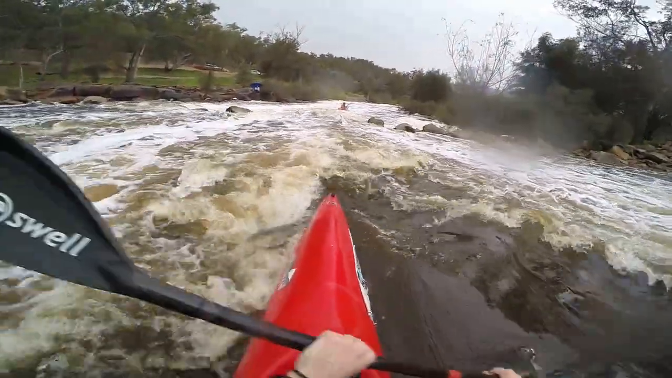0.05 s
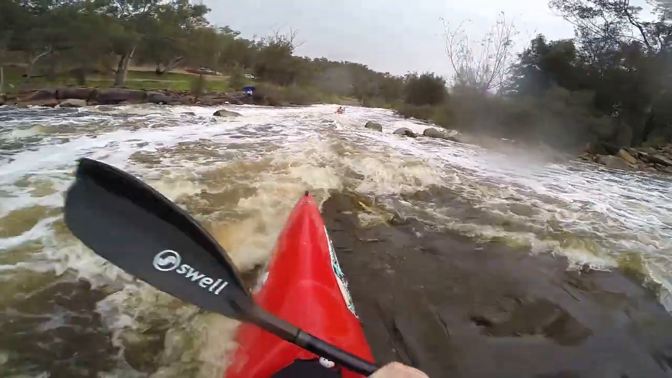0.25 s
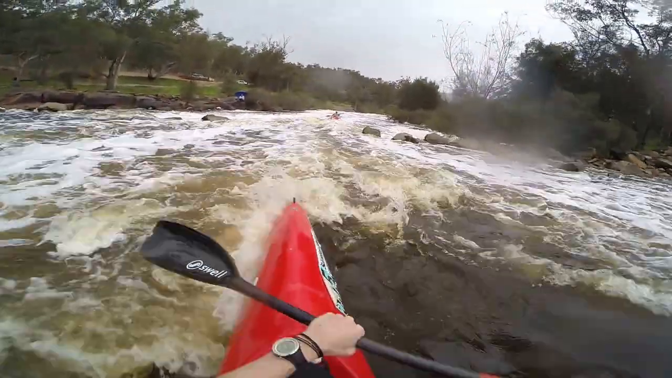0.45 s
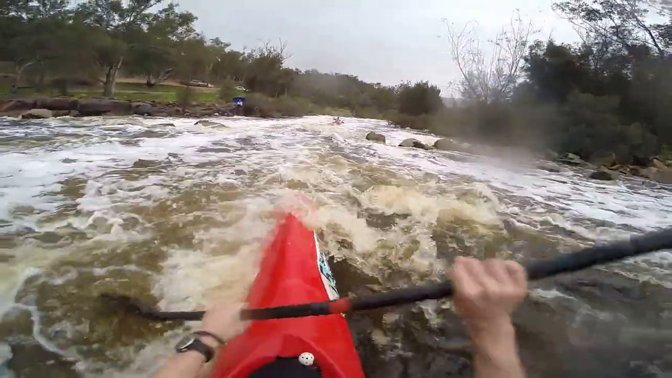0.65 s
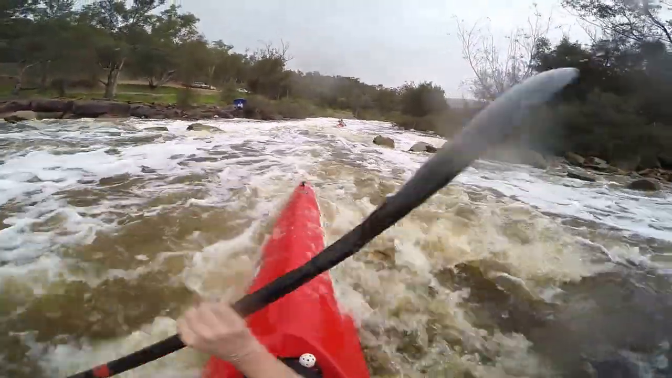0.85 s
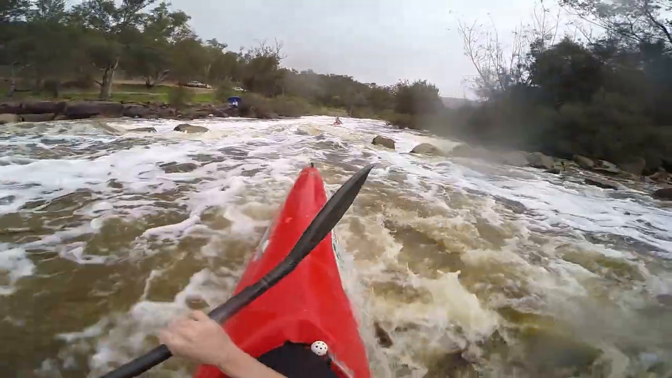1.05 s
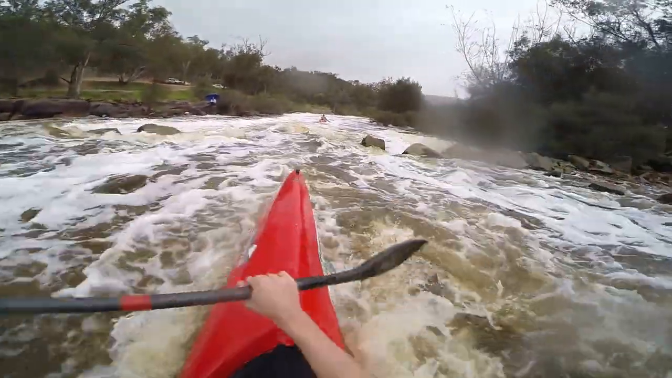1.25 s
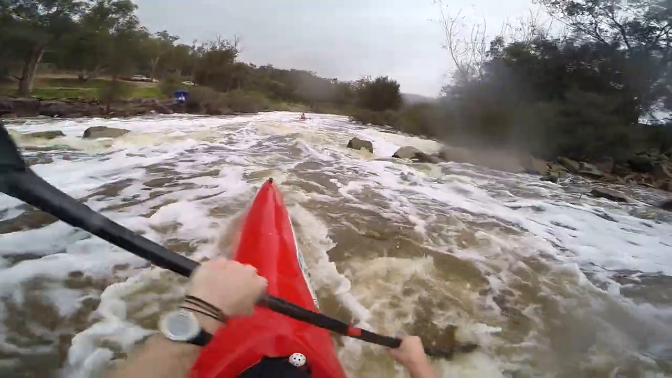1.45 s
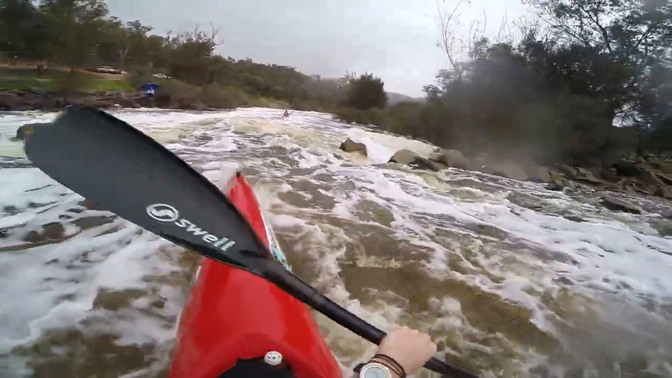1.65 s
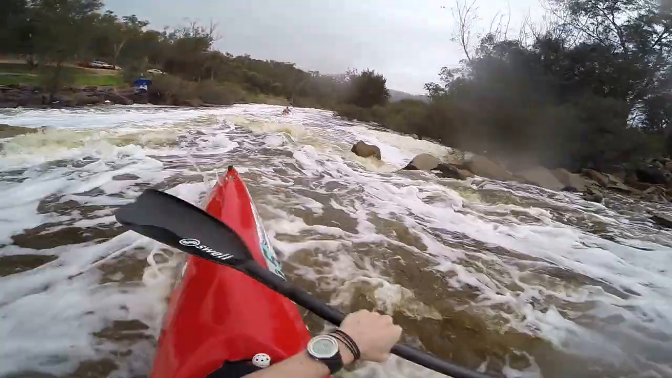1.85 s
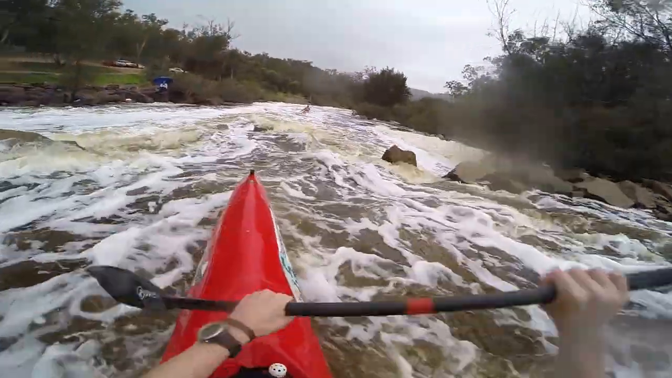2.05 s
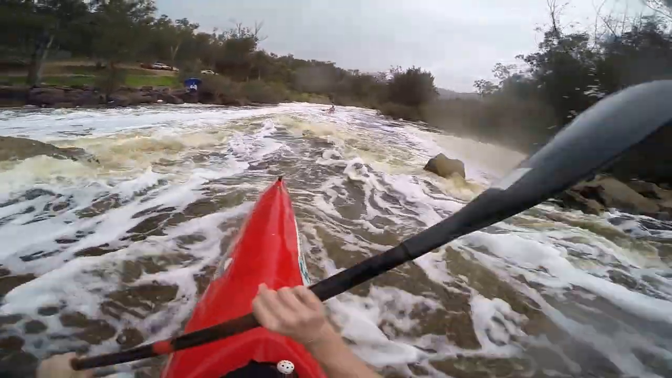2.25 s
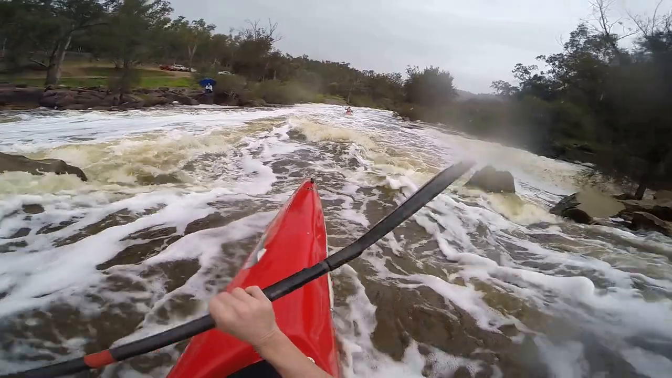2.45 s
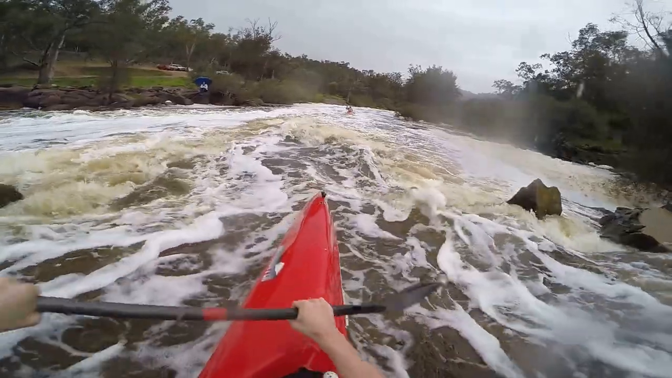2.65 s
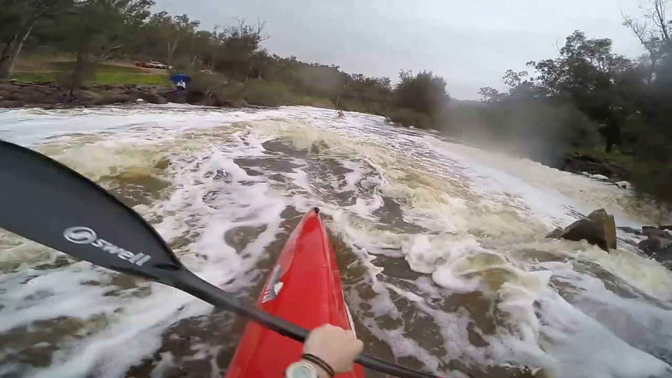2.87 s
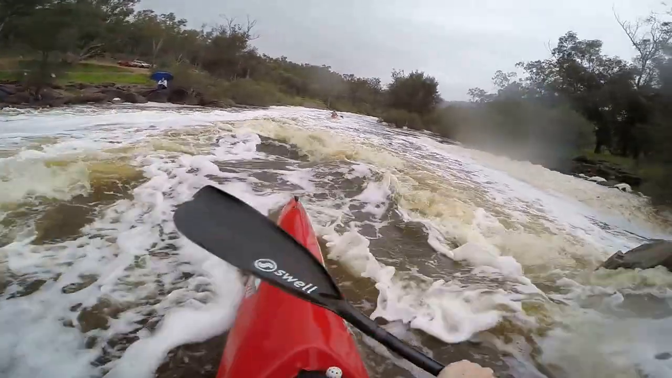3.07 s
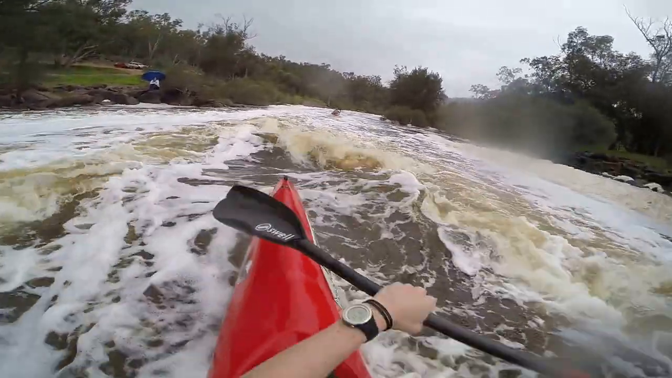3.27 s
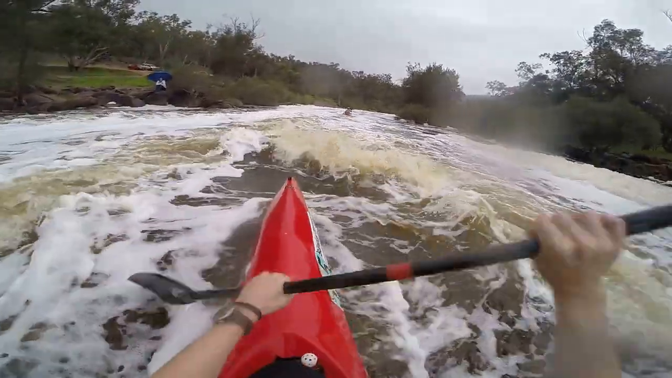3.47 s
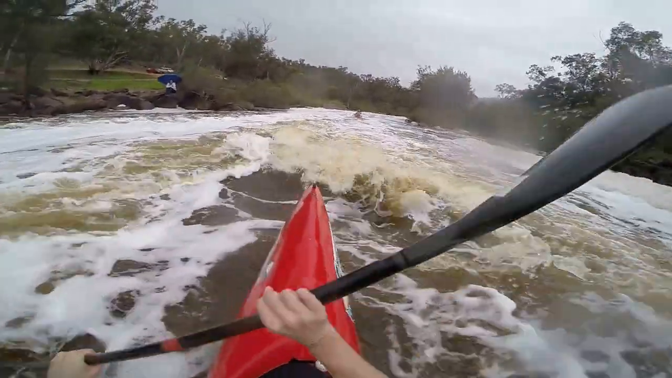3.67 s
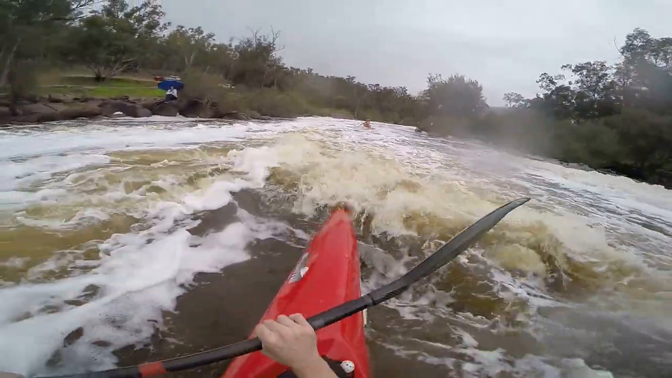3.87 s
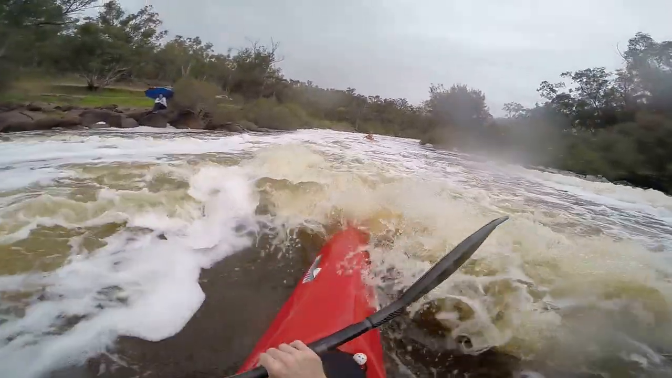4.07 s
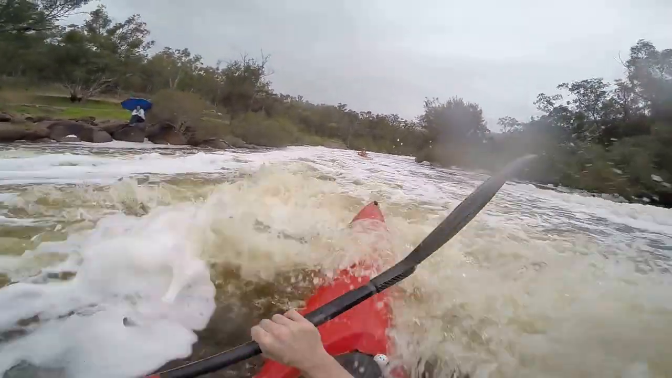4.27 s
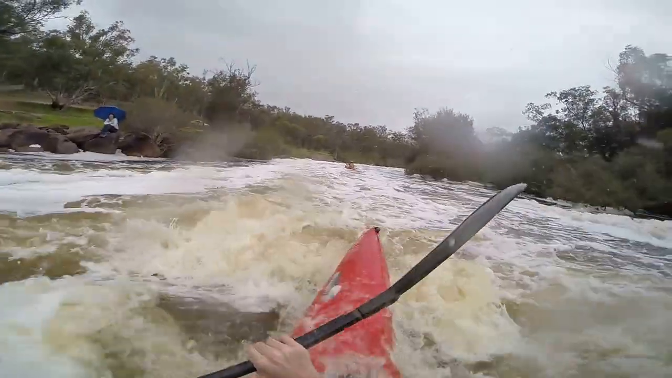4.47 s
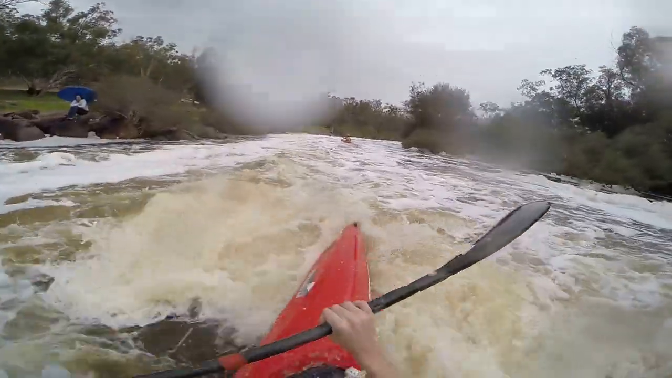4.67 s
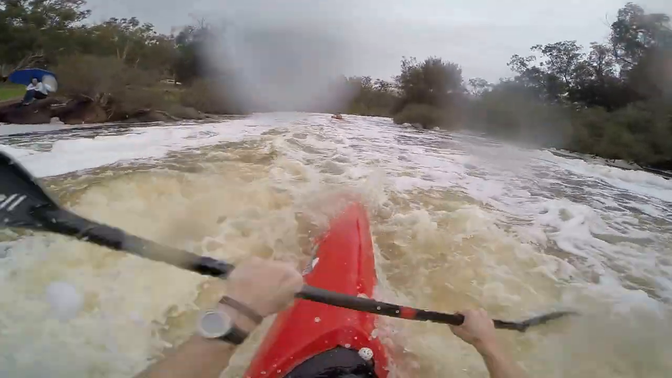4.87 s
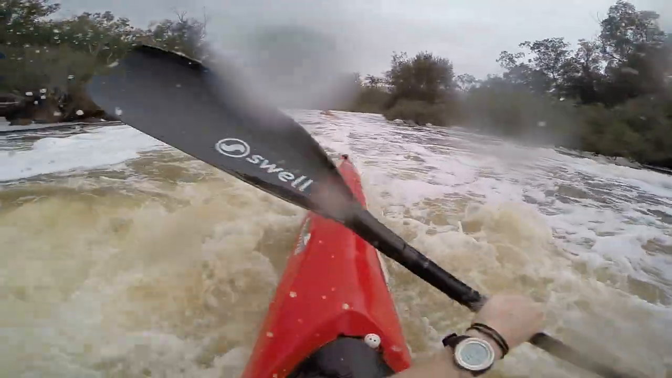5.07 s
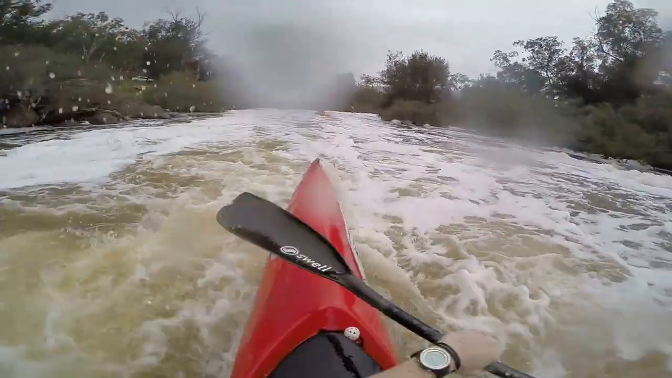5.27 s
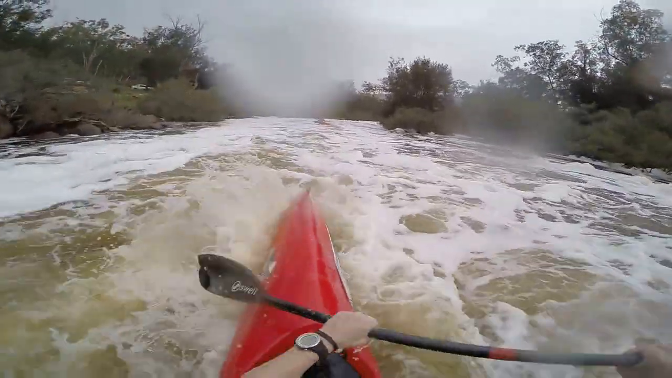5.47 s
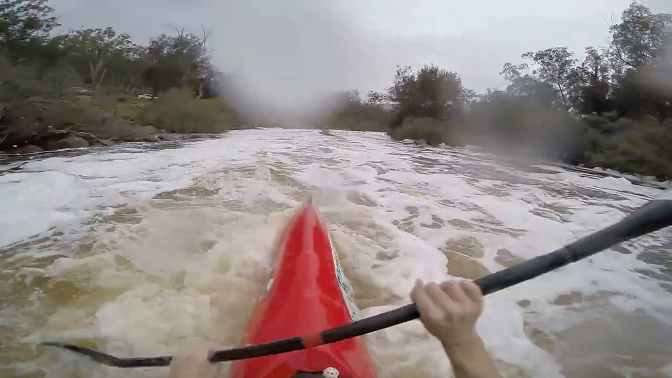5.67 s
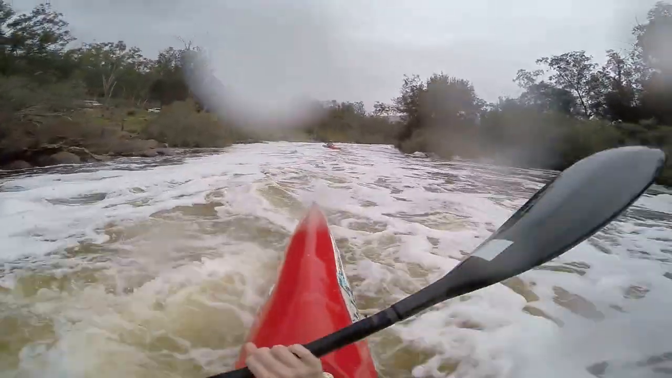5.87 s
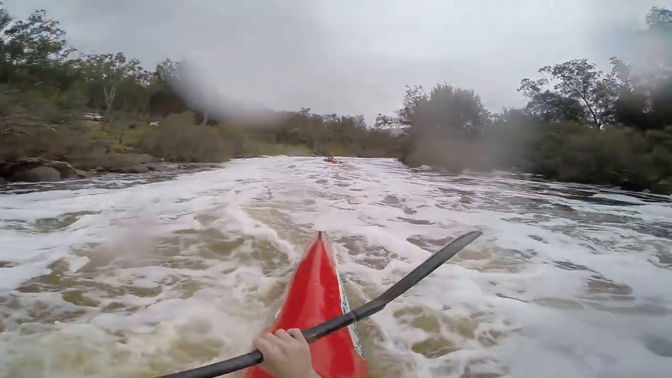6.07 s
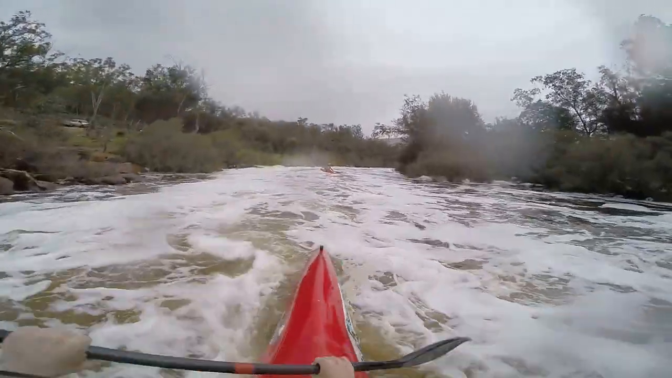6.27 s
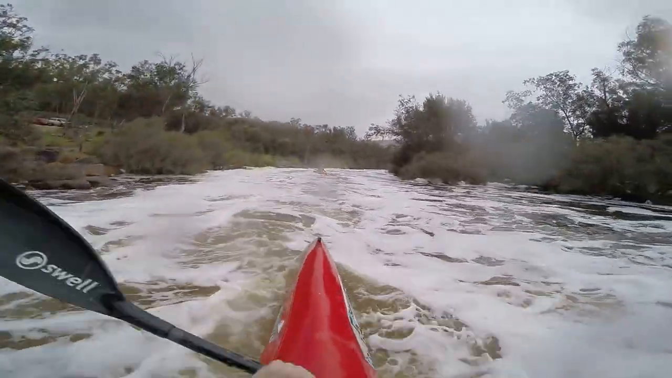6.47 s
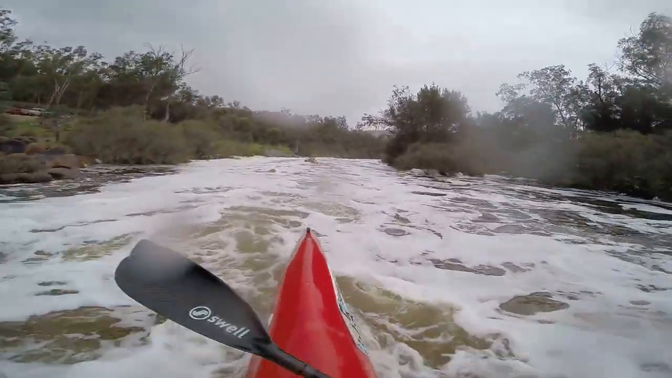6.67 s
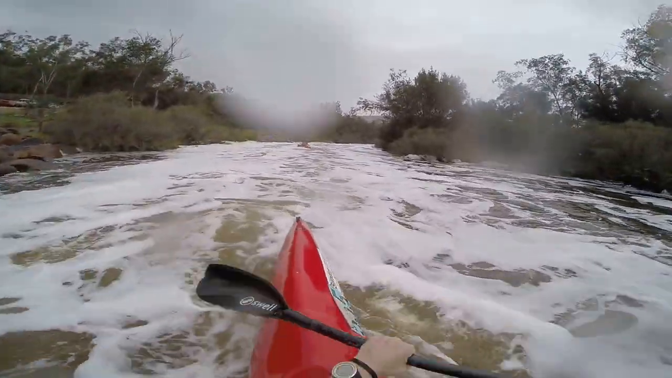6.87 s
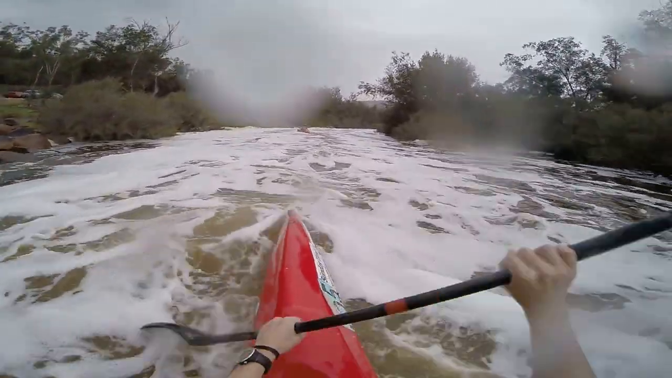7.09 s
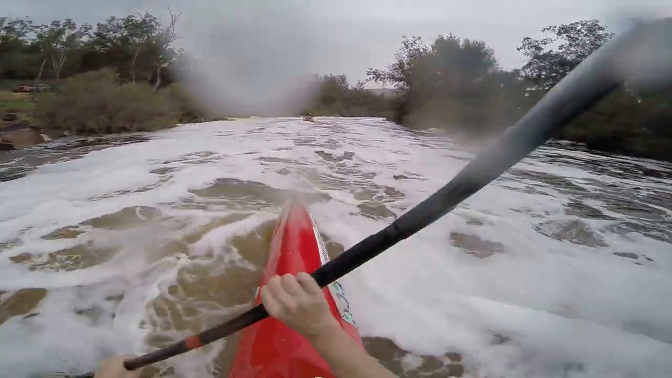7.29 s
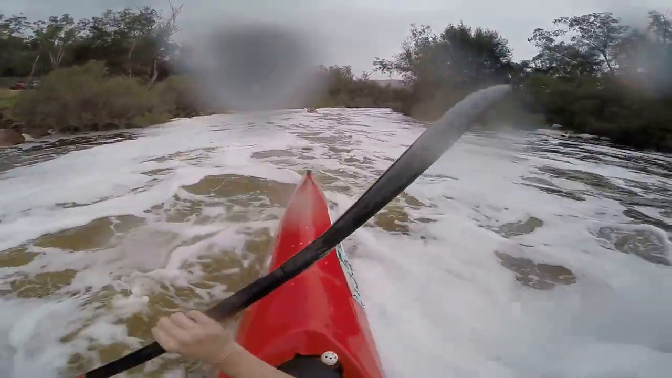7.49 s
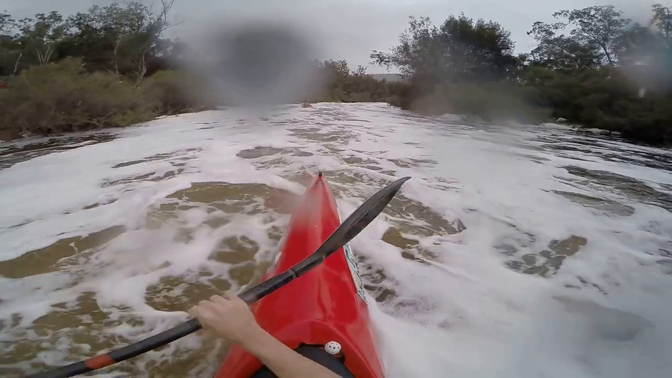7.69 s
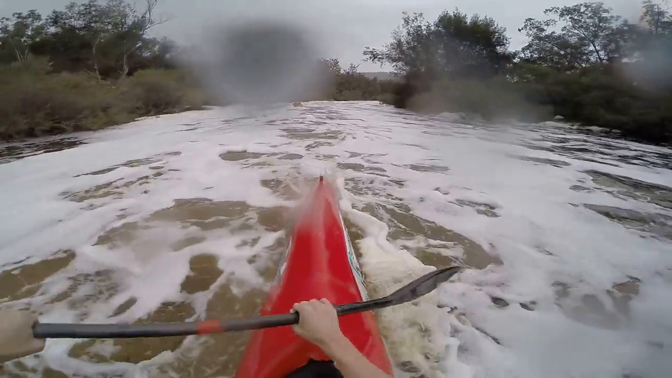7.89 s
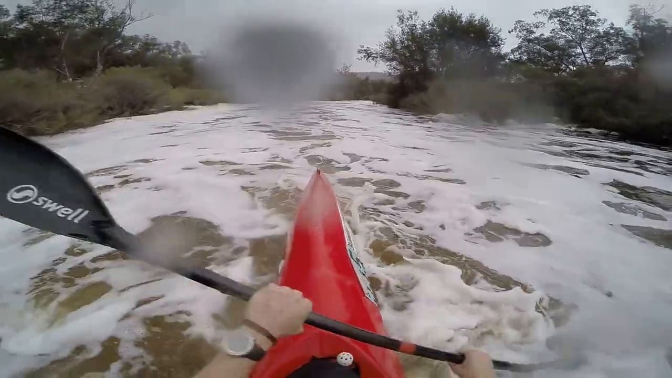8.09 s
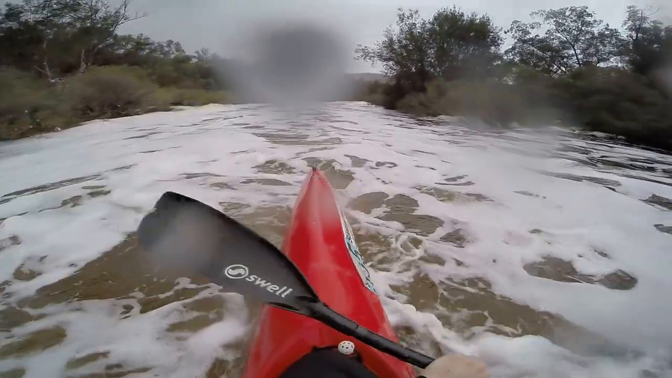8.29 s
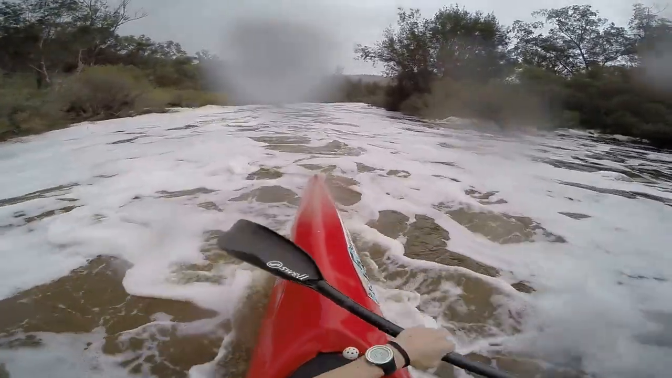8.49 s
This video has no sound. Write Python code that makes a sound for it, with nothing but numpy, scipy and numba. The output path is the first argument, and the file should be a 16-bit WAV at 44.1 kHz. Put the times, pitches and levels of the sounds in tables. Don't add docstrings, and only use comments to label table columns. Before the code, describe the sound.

A rushing, boxy river roar starts strong, eases, then swells as the boat hits a breaking wave. Hollow hull booms, dull slaps and a brief wavering low hum accompany crackling drops on the microphone's plastic shell. Afterward the water quickly thins, leaving faint foam, a small hiss and short airy whistle of water shedding from the paddle, and light ticks outdoors.

```python
import sys
import numpy as np
from scipy import signal
from scipy.fft import rfft, irfft, next_fast_len
from scipy.io import wavfile
from scipy.ndimage import uniform_filter1d
from numba import njit

SR = 44100
rng = np.random.default_rng(int(sys.argv[2]) if len(sys.argv) > 2 else 0)


def decibels_to_gain(level_db):
    exponent = np.asarray(level_db, float) / 20
    return 10 ** exponent


def pcm_store(signal):
    levels = np.round(np.clip(np.atleast_2d(signal), -1, 1) * 32767)
    wavfile.write(sys.argv[1], SR, levels.astype(np.int16).T)


N = 376613

# [t/s, level/dB]
FLOW = [(0, -41), (.26, -39), (.9, -37.5), (1.4, -40.5), (1.7, -42.5), (2.2, -46.5), (2.9, -45.5),
        (3.2, -41.5), (4.0, -39), (4.45, -38.5), (4.62, -34.5), (4.86, -40.5), (5.4, -40.5), (5.7, -47),
        (6.1, -48.5), (6.5, -54), (7.1, -54.5), (8.3, -59)]


def curve(table, column):
    table = np.array(table)
    return np.interp(np.arange(N) / SR, table[:, 0], table[:, column])


def walk(rate):
    hold = int(SR / rate)
    steps = np.repeat(rng.standard_normal(N // hold + 1), hold)
    return 1.2 * uniform_filter1d(uniform_filter1d(steps, hold), hold)[:N]


def swell(rows):
    t = np.arange(N) / SR
    power = 0
    for peak_s, db, rise_s, fall_s in rows:
        side_s = np.where(t < peak_s, rise_s, fall_s)
        power = power + decibels_to_gain(2 * db) * np.exp(-((t - peak_s) / side_s) ** 2)
    return np.sqrt(power)


def follow(db, slope):
    loud_db = -40
    return decibels_to_gain(db + slope * (curve(FLOW, 1) - loud_db))


def shade(points, hz):
    points = np.array(points)
    return np.interp(np.log(hz + 1e-9), np.log(points[:, 0]), points[:, 1])


def colour(x, points, lo_hz, hi_hz):
    hz = np.fft.rfftfreq(N, 1 / SR)
    spectrum = rfft(x) * decibels_to_gain(shade(points, hz))
    inside = (hz > lo_hz) & (hz < hi_hz)
    power = 2 * np.sum(np.abs(spectrum[inside]) ** 2) / N ** 2
    return irfft(spectrum, N) / np.sqrt(power)


def housing(x):
    # [f/Hz, width/Hz, level/dB]
    resonances = [(975, 290, -1), (1264, 67, 3), (1730, 660, 4.5), (2103, 230, -1.5), (2483, 540, 6.5),
                  (3036, 91, -5), (3356, 200, 3), (4744, 340, 4), (5300, 840, -4.5), (5700, 360, 5),
                  (8470, 1140, 4.5), (10230, 840, -2), (11000, 700, -5.5), (12250, 1850, -6)]
    hz = np.fft.rfftfreq(4096, 1 / SR)
    db = sum(gain * np.exp(-(2 * (hz - f) / width) ** 2 / 2) for f, width, gain in resonances)
    cepstrum = irfft(np.log(decibels_to_gain(db)))
    cepstrum[1:2048] *= 2
    cepstrum[2049:] = 0
    response = irfft(np.exp(rfft(cepstrum)))[:1024]
    return signal.fftconvolve(x, response)[:N]


def far():
    # [f/Hz, level/dB per Hz]
    wash_colour = [(150, -13), (350, 1.5), (800, -3.5), (1500, -7.5), (3000, -8), (5000, -7), (8000, -22.5)]
    wash = colour(housing(rng.standard_normal(N)), wash_colour, 240, 1150)
    return wash * decibels_to_gain(-63 + 1.8 * walk(5))


def blade():
    # [f/Hz, level/dB per Hz]
    sheet_colour = [(1500, -11), (2600, -5.5), (3300, -0.5), (4800, -3), (6000, -11), (9000, -28),
                    (15000, -50)]
    seam_colour = [(2900, -38), (3280, -3), (3400, 0), (3550, -2), (4000, -37)]
    # [peak t/s, level/dB, rise/s, fall/s]
    sheets = [
        (6.63, -52, 0.079, 0.12),
        (7.38, -49, 0.1, 0.13),
    ]
    # [peak t/s, level/dB, rise/s, fall/s]
    whistles = [
        (7.46, -59, .06, .05),
        (7.55, -48.5, .04, 0.0099),
    ]
    sheet_gain = swell(sheets)
    seam_gain = np.hypot(sheet_gain * decibels_to_gain(-17), swell(whistles))
    sheet = colour(housing(rng.standard_normal(N)), sheet_colour, 2970, 5000) * decibels_to_gain(1.2 * walk(25))
    seam = colour(rng.standard_normal(N), seam_colour, 3100, 5000)
    return sheet * sheet_gain + seam * seam_gain


def mount():
    # [f/Hz, level/dB per Hz]
    shake_colour = [(8, 8.5), (20, 6.5), (45, -3.5), (70, -4.5), (120, -59.5)]
    # [peak t/s, level/dB, rise/s, fall/s]
    waves = [(.02, -44.5, .03, 0.12), (.31, -50, 0.022, 0.031), (1.04, -41, 0.21, 0.13),
             (1.64, -47, 0.081, 0.2), (2.45, -48, 0.067, 0.14), (2.9, -38, 0.045, 0.49),
             (3.73, -35.5, 0.05, 0.054), (4.45, -32, 0.17, .3), (5.26, -37, 0.16, 0.13),
             (5.85, -49.5, .06, 0.24), (6.56, -49.5, 0.048, 0.07), (6.92, -48.5, 0.048, 0.078),
             (7.32, -43, 0.051, .06), (7.6, -47.5, 0.069, 0.13), (8.13, -47.5, 0.06, 0.064),
             (8.29, -50, 0.032, 0.067), (8.54, -47, 0.053, .04)]
    shake = colour(rng.standard_normal(N), shake_colour, 17.4, 58)
    return shake * np.hypot(swell(waves), follow(-54, slope=0.26)) * decibels_to_gain(1.5 * walk(8.3))


def boom():
    # [f/Hz, level/dB per Hz]
    boom_colour = [(30, -31), (55, 1), (95, -2.5), (130, -4.5), (200, -10.5), (400, -19.5), (900, -49)]
    # [peak t/s, level/dB, rise/s, fall/s]
    surges = [(.45, -49.5, 0.038, .05), (.9, -49, 0.3, 0.12), (1.35, -52, .05, 0.047),
              (1.95, -53, 0.13, .05), (2.3, -50, 0.12, 0.35), (3.14, -45, 0.094, 0.067),
              (3.5, -45, 0.23, 0.12), (4.15, -43.5, 0.18, 0.18), (4.55, -41, 0.089, 0.19),
              (5.09, -47, .06, .06), (5.35, -44.5, .1, 0.091), (6.35, -54, .1, 0.11),
              (6.65, -53, .1, 0.079), (7.25, -57, 0.074, .06), (7.47, -55, 0.044, .05)]
    gain = np.hypot(swell(surges), follow(-50.5, slope=0.097))
    return colour(rng.standard_normal(N), boom_colour, 64.0, 200) * gain * decibels_to_gain(1.3 * walk(14))


def hum():
    # [start t/s, length/s, level/dB, first f/Hz, last f/Hz]
    flexes = [
        (5.094, 0.074, -30.5, 98.5, 100.4),
        (5.15, 0.092, -30.5, 98, 115),
        (5.221, 0.081, -28, 116.6, 104.3),
        (7.369, 0.27, -44.5, 182.3, 73.5),
    ]
    edge_s, settle_s = 0.036, 0.072
    hz, gain, t = np.full(N, 100.), np.zeros(N), np.arange(N) / SR
    for s, length, db, first_hz, last_hz in flexes:
        settling = last_hz + (first_hz - last_hz) * np.exp(-np.maximum(t - s, 0) / settle_s)
        hz = np.where(t > s, settling, hz)
        fade = np.clip(np.minimum(t - s, s + length - t) / edge_s, 0, 1)
        gain = np.maximum(gain, decibels_to_gain(db) * fade)
    phase = 2 * np.pi * np.cumsum(hz * (1 + 0.0741 * walk(45))) / SR
    tone = np.sin(phase) + 0.34 * np.sin(1.4 * phase)
    return np.sqrt(2) * tone * gain * decibels_to_gain(1.1 * walk(35))


def slaps():
    # [t/s, peak level/dB, f/Hz, t60/s]
    slap_table = [
        (2.776, -35.5, 77.6, 0.11),
        (2.902, -27, 75.4, 0.057),
        (4.126, -29, 80.7, 0.034),
        (4.865, -31, 72.7, 0.05),
        (4.993, -30, 83.4, 0.06),
        (5.345, -20, 96, 0.046),
        (5.9, -30, 76, 0.056),
        (6.772, -42, 71, 0.084),
        (7.776, -32, 103, 0.043),
    ]
    out = np.zeros(N)
    t = np.arange(SR // 5) / SR
    for s, db, hz, t60 in slap_table:
        push = (1 - np.exp(-t / 0.01)) ** 2
        thud = np.sin(2 * np.pi * hz * t) * push * 1000. ** (-t / max(t60, .01))
        i = int(s * SR)
        out[i:i + len(t)] += decibels_to_gain(db) * thud / np.abs(thud).max()
    return out


def ring(hz, t60):
    t = np.arange(SR // 20) / SR
    push = (1 - np.exp(-1.6 * np.mean(hz) * t)) ** 2
    decay = 1000. ** (-t / max(t60, .002))
    sound = np.sin(2 * np.pi * np.outer(t, hz)).sum(axis=1) * push * decay
    return sound / np.abs(sound).max()


def drops():
    # [t/s, level/dB, favoured f/Hz, fall away/dB per octave]
    single = [(0.7687, -18.5, 3000, 20), (1.3456, -24.5, 2300, 30), (1.5763, -30, 1520, 22),
              (1.8053, -35, 1520, 18), (2.3248, -25, 3170, 14), (2.3243, -34.5, 6420, 32),
              (2.809, -35, 2430, 12), (3.256, -19, 2290, 36), (4.1624, -24, 2430, 18),
              (5.162, -21.5, 1670, 14), (5.1624, -11, 8430, 42), (5.9008, -33.5, 5700, 24),
              (5.9688, -34, 2000, 13), (6.3797, -22, 2220, 22), (6.3797, -34, 7550, 18),
              (6.522, -38, 2430, 26), (6.5856, -39, 6420, 30), (7.062, -37, 2620, 16),
              (7.174, -40, 4520, 36), (7.6512, -35, 2000, 8), (7.661, -41, 2430, 15),
              (7.6872, -47, 6420, 16), (7.707, -39, 2600, 14), (7.7486, -38, 2430, 16),
              (7.8661, -39, 7200, 19), (7.9608, -44, 5400, 24), (8.0335, -31.5, 2700, 27),
              (8.0337, -33.5, 7400, 20), (8.4923, -17.5, 2860, 21), (8.4923, -25, 6420, 24)]
    # [t/s, level/dB, favoured f/Hz, fall away/dB per octave]
    shower = [(4.3959, -15, 2820, 19), (4.3959, -11, 5900, 34), (4.4445, -28, 6420, 22),
              (4.4801, -32, 6000, 11), (4.4862, -18, 2780, 16), (4.49, -26, 3970, 8), (4.517, -34, 8920, 9),
              (4.54, -28, 4520, 14), (4.5701, -28, 4520, 22), (4.5863, -22, 4700, 18),
              (4.508, -30, 5500, 10), (4.512, -37, 8920, 10), (4.546, -31, 4520, 8.9),
              (4.472, -26, 2900, 20), (4.605, -37, 8920, 30), (4.6125, -22, 2980, 15)]
    # [f/Hz, spread/Hz, t60/s]
    wall = [(1520, 160, .018), (2430, 510, 0.017), (4520, 700, 0.014), (6420, 1300, 0.0065),
            (8920, 3460, 0.0039)]
    # [t/s, peak level/dB, f/Hz, t60/s]
    plops = [(1.3435, -35, 785, 0.038), (2.911, -36, 171, 0.036), (8.094, -47, 3370, 0.044),
             (3.257, -26, 1130, 0.024), (4.128, -38, 264, 0.023), (4.134, -37, 560, .02),
             (4.3962, -48, 895, 0.0084), (5.1614, -27.5, 302, 0.0066), (5.1618, -26, 650, 0.0042),
             (5.162, -35, 1090, 0.0046), (5.1627, -29, 12500, 0.0037), (5.969, -41, 900, .015),
             (6.3905, -38, 1380, .02), (7.33, -44.5, 700, 0.035), (7.663, -41, 1180, 0.018),
             (7.748, -35, 720, 0.03), (7.779, -43, 600, 0.014), (8.4922, -44, 700, 0.0074)]
    out = np.zeros(N + SR)
    modes = np.arange(-2, 3) / 4
    for s, db, near_hz, fall_db in single + shower:
        i = int(s * SR)
        detune = .07 * rng.standard_normal((len(wall), len(modes)))
        for (hz, spread, t60), shift in zip(wall, detune):
            level = db + 4.0 - fall_db * np.abs(np.log2(hz / near_hz))
            tick = decibels_to_gain(level) * ring(hz + spread * (modes + shift), t60)
            out[i:i + len(tick)] += tick
    for s, db, hz, t60 in plops:
        i = int(s * SR)
        plop = decibels_to_gain(db) * ring([hz], t60)
        out[i:i + len(plop)] += plop
    return out[:N]


@njit
def bubbles(start, hz, cycles, size, glide):
    out = np.zeros(N + 8192)
    for k in range(len(start)):
        length = min(int(cycles[k] * SR / hz[k] * 2), 8000)
        step, phase, gain = 2 * np.pi * hz[k] / SR, 0., size[k]
        fade, rise = np.exp(-5. / length), np.exp(glide / length)
        for i in range(length):
            out[start[k] + i] += gain * np.sin(phase)
            phase += step
            step *= rise
            gain *= fade
    return out[:N]


def froth(count, lo_hz, hi_hz, cycles, scatter_db, grain_db, flicker_db):
    when, pitch, loudness, length = rng.random((count, 4)).T
    hz = lo_hz * (hi_hz / lo_hz) ** pitch
    size = decibels_to_gain(np.minimum(-scatter_db * np.log(1 - loudness), 15)) / np.sqrt(hz)
    grains = bubbles((when * N).astype(np.int64), hz, cycles * (.5 + length), size, 0.27)
    grains = np.diff(grains, prepend=0)
    mix = rng.standard_normal(N) + decibels_to_gain(grain_db) * grains / np.std(grains)
    padded = next_fast_len(N)
    spectrum = rfft(mix, padded)
    octave = np.log2(np.fft.rfftfreq(padded, 1 / SR) + 1e-9)
    out, shared = 0, walk(11)
    for centre in np.arange(7, 15, 2 / 3):
        share = np.clip(1 - np.abs(octave - centre) * 3 / 2, 0, 1)
        band = irfft(spectrum * share, padded)[:N]
        out = out + band * decibels_to_gain(flicker_db * (0.59 * shared + 0.79 * walk(26)))
    return out


def spray():
    # [f/Hz, level/dB per Hz]
    fizz_colour = [(1200, -5.5), (2500, -4.5), (3400, -2.5), (5000, 0.5), (7000, -8.5), (8000, -20.5),
                   (10500, -14), (13000, -18.5), (16000, -46)]
    # [peak t/s, level/dB, rise/s, fall/s]
    sprays = [(.15, -47.5, 0.11, 0.18), (.55, -54, 0.15, 0.38), (1.24, -48.5, 0.11, 0.022),
              (1.54, -49.5, 0.055, 0.094), (2.3, -58.5, 0.14, 0.28), (2.95, -54, 0.18, 0.43),
              (3.75, -55.5, 0.26, 0.12), (4.1, -50, 0.13, 0.27), (4.52, -47, 0.18, 0.06),
              (4.86, -50, 0.054, 0.07), (5.11, -44, 0.12, 0.14), (5.73, -55, 0.14, 0.13),
              (6.03, -58.5, 0.097, 0.062), (8.15, -67.5, .08, 0.1)]
    fizz = froth(count=24000, lo_hz=2490, hi_hz=13600, cycles=1.5, scatter_db=4.0, grain_db=-6.0, flicker_db=1.6)
    fizz = colour(housing(fizz), fizz_colour, 5220, 8700)
    return fizz * np.hypot(swell(sprays), follow(-52, slope=1.1))


def white_water():
    # [f/Hz, level/dB per Hz]
    roar_colour = [(120, -5.5), (250, 2), (600, -2.5), (1000, -4.5), (1500, 2), (2700, -1), (3600, -26),
                   (6000, -10), (15000, -72)]
    # [t/s, lower over upper/dB]
    port = [(0, 2.5), (1, -2.5), (1.8, 2), (2.6, 2), (3.3, 2.5), (4.0, 8), (4.5, -1), (5.2, -3),
            (5.7, -5.5), (6.5, 2), (7.3, -3), (8, -3), (8.4, 3)]
    # [peak t/s, level/dB, rise/s, fall/s]
    breakers = [
        (.55, -41, .08, 0.07),
        (1.2, -45, 0.14, 0.048),
        (4.1, -44.5, 0.066, 0.16),
        (5.03, -41, 0.098, 0.11),
        (6.65, -66, 0.087, .1),
        (7.55, -51.5, 0.065, 0.13),
        (8.15, -57.5, .08, 0.078),
        (8.54, -57, .04, .04),
    ]
    roar = froth(count=16000, lo_hz=493.0, hi_hz=4110, cycles=4.3, scatter_db=2.5, grain_db=-9.5, flicker_db=1.35)
    roar = colour(housing(roar), roar_colour, 580, 4400)
    lower = signal.lfilter(*signal.iirpeak(1650, 3.5, fs=SR), roar)
    upper = signal.lfilter(*signal.iirpeak(2500, 3.5, fs=SR), roar)
    tilt = decibels_to_gain(curve(port, 1) / 2)
    roar = roar + (tilt - 1) * lower + (1 / tilt - 1) * upper
    flow = decibels_to_gain(curve(FLOW, 1) + 0.37 * walk(7))
    return roar * np.hypot(flow, swell(breakers))


def scene():
    hull = mount() + boom() + hum() + slaps()
    return (far() + blade() + hull + drops() + spray() + white_water())[None]


def band_limit(x):
    return signal.sosfilt(signal.butter(12, 15350, fs=SR, output="sos"), x)


def record(dry):
    # [f/Hz, level/dB per Hz]
    hiss_colour = [(300, -11), (3000, 7), (10000, 0), (15000, -8)]
    hiss = colour(rng.standard_normal(N), hiss_colour, 9000, 18000) * decibels_to_gain(-85)
    return band_limit(dry + hiss)


dry = scene()
out = record(dry)
pcm_store(out)
```